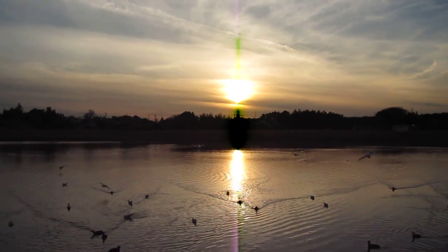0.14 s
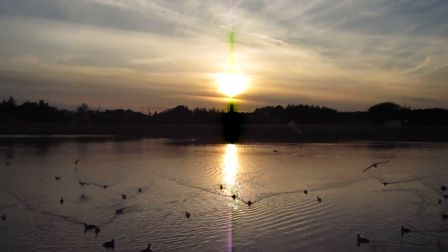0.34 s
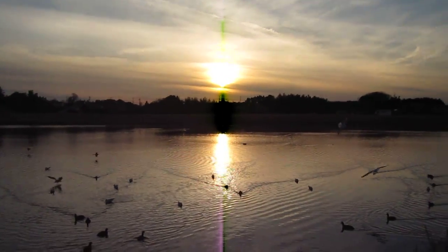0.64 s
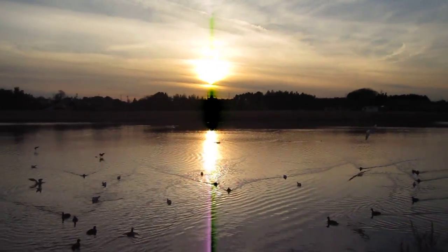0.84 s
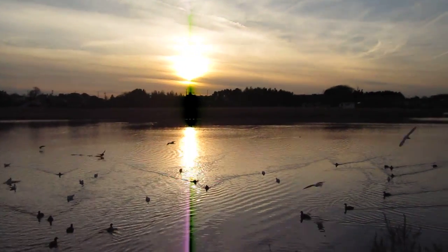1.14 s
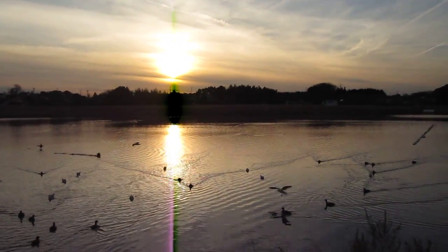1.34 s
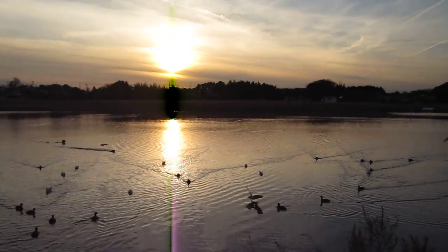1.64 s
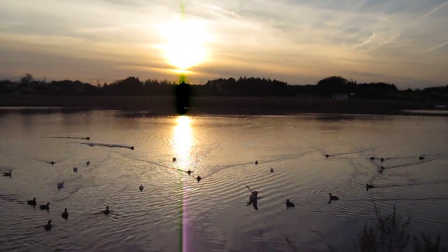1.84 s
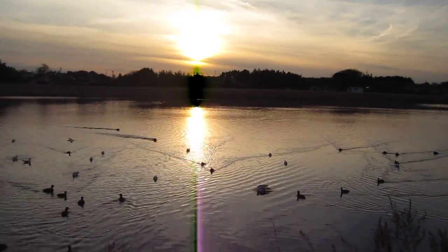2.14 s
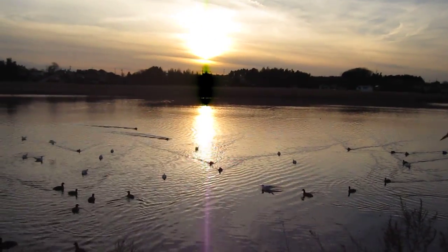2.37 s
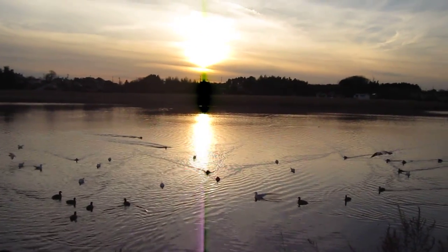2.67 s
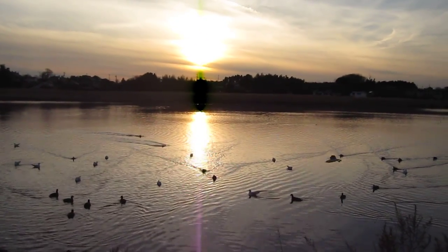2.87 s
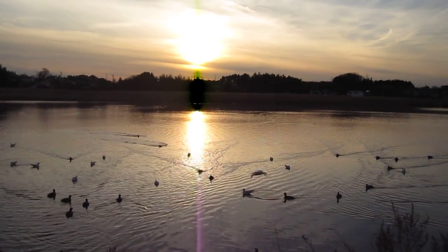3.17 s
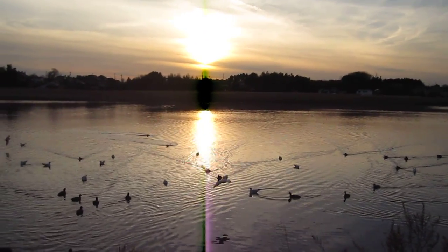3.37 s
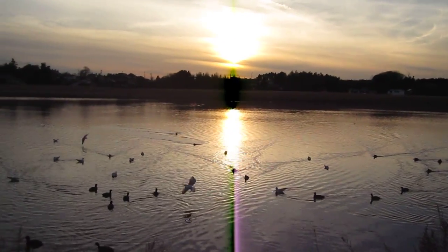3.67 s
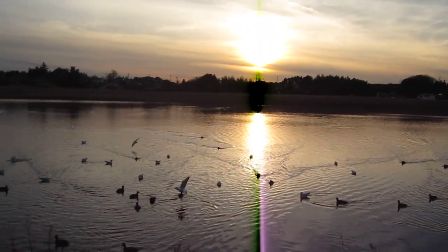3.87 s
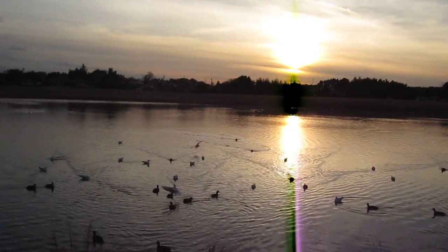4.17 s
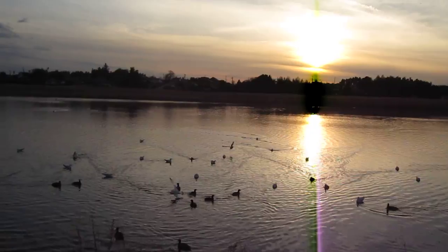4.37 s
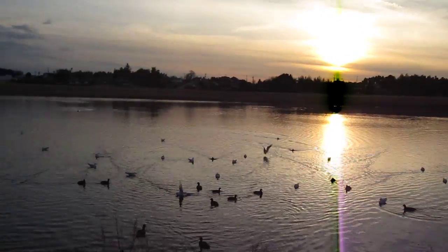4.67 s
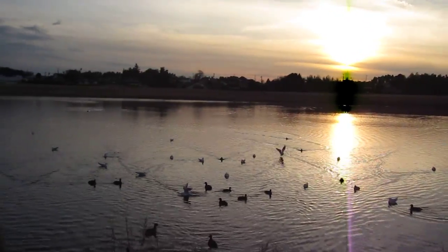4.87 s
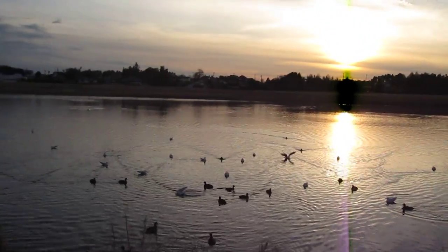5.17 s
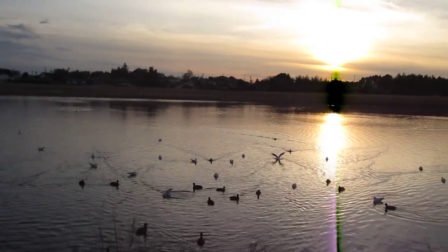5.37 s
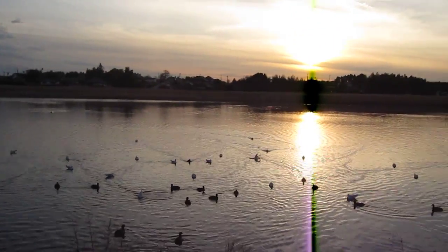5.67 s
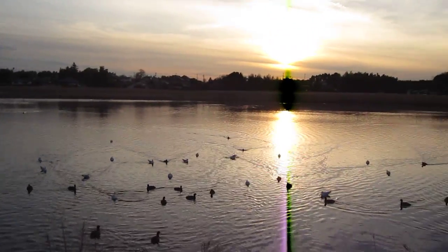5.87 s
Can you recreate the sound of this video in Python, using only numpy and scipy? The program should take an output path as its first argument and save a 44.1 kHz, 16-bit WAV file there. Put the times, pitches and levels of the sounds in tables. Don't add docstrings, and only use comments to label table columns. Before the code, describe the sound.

A faint steady bed of distant traffic, air and microphone hiss lies under everything, its bass swelling gently. From about 0.7 s waterfowl paddle nearby: soft spray, clustered hollow plops near 1 s, then gurgling small bubbles and sharp ticking drops until about 1.95 s. At 1.95 s a gull yelps quickly upward and breaks into a harsh, high, raspy scream, rough and buzzing, sliding down and ending near 2.6 s with a dull short echo off the lake. Splashing resumes at 2.6 s, with crisp snapping drops around 2.75 to 2.95 s, thinning to a few plops by 3.5 s. After a quiet gap, a second cry comes from 4.04 to 4.6 s: lower yelp, a dip, a ragged swell, then a clearer falling end. Quiet air follows, with small plops near 5.15 and 5.4 s, low soft wind thumps around 5.3 s and tiny dry ticks at 5.9 s.

```python
import sys
import numpy as np
from scipy import signal
from scipy.fft import rfft, irfft, next_fast_len
from scipy.io import wavfile

SR = 44100
rng = np.random.default_rng(int(sys.argv[2]) if len(sys.argv) > 2 else 0)


def pcm_store(signal):
    levels = np.round(np.clip(np.atleast_2d(signal), -1, 1) * 32767)
    wavfile.write(sys.argv[1], SR, levels.astype(np.int16).T)


def boost_factor(decibels):
    exponent = np.asarray(decibels, float) / 20
    return 10 ** exponent


N = 265237
T = np.arange(N) / SR


def curves(tables, fade_s=0.00054):
    rows = np.vstack(tables)
    gate = 0
    for table in tables:
        inside_s = np.minimum(T - table[0][0], table[-1][0] - T)
        gate = gate + np.clip(inside_s / fade_s + .5, 0, 1)
    columns = [np.interp(T, rows[:, 0], column) for column in rows[:, 1:].T]
    return columns, np.minimum(gate, 1)


def per_cry(rows):
    between_cries_s = 3.3
    return [np.where(T < between_cries_s, first, second) for first, second in zip(*rows)]


def lowpass(x, order, hz):
    return signal.sosfilt(signal.butter(order, hz, fs=SR, output="sos"), x)


def colour(x, points):
    hz, db = np.transpose(points)
    size = next_fast_len(N)
    f = np.maximum(np.arange(size // 2 + 1) * SR / size, 1)
    gain_db = np.interp(np.log(f), np.log(hz), db, left=-60, right=-60)
    out = irfft(rfft(x, size) * boost_factor(gain_db), size)[:N]
    return out / out.std()


def turbulence(points):
    return colour(rng.standard_normal(N), points)


def shake(width_hz):
    z = lowpass(rng.standard_normal((2, N)), 2, width_hz / 2)
    return (z[0] + 1j * z[1]) / np.sqrt(2 * np.mean(z ** 2))


def jitter(depth, width_hz):
    return 1 + depth * shake(width_hz).real


def tone(hz, rough, width_hz):
    rough = np.clip(rough, 0, 1)
    phasor = np.exp(2j * np.pi * np.cumsum(hz) / SR)
    return phasor * (np.sqrt(1 - rough) + np.sqrt(rough) * shake(width_hz))


def add_ring(out, start_s, peak_db, hz, t60_s, rise_s, glide):
    t = np.arange(int((t60_s + 3 * rise_s) * SR)) / SR
    shape = (1 - np.exp(-t / rise_s)) ** 2 * np.exp(-np.log(1000) * t / t60_s)
    ring = boost_factor(peak_db) * shape / shape.max() * np.sin(2 * np.pi * hz * (t + glide * t ** 2 / t60_s))
    i = max(int(start_s * SR), 0)
    out[i:i + len(t)] += ring[:N - i]


# freq_hz, density_db_per_hz
AIR_SPECTRUM = [(20, -10), (45, -3), (80, -5.5), (186, -9), (336, -9.5), (421, -12), (720, -13.5),
                (1160, -14.5), (1460, -16.5), (1750, -16), (2300, -22), (3310, -23.5), (5340, -27.5),
                (17200, -39)]
# freq_hz, level_db
WHINE = [
    (15735, -88),
]


def air():
    bed = turbulence(AIR_SPECTRUM)
    bass = lowpass(bed, 2, 200)
    swell = boost_factor(1.1 * shake(3.1).real)
    whine = sum(np.sqrt(2) * boost_factor(db) * np.sin(2 * np.pi * hz * T) for hz, db in WHINE)
    return boost_factor(-47.4) * (bed + bass * (swell - 1)) + whine


# start_s, peak_db, pitch_hz
THUMPS = [
    (1.297, -45, 57.7),
    (5.319, -38.5, 85.5),
    (5.347, -39, 77),
]
# start_s, peak_db, centre_hz
CREAKS = [
    (5.8965, -37, 9000),
    (5.948, -46, 11500),
    (5.9742, -38, 8600),
]


def camera_knocks():
    out = np.zeros(N)
    for start_s, peak_db, hz in CREAKS:
        add_ring(out, start_s, peak_db, hz, .001, .00005, 0)
    for start_s, peak_db, hz in THUMPS:
        add_ring(out, start_s, peak_db, hz, .12, .008, 0)
    return out


# start_s, peak_db, pitch_hz, t60_s
PLOPS = [(0.895, -40, 710, 0.041), (1.027, -41, 736, 0.042), (1.089, -39, 760, 0.081),
         (1.174, -57, 729, 0.06), (1.211, -33, 632, 0.031), (1.229, -27.5, 521, 0.034),
         (2.591, -35, 1530, 0.049), (2.746, -54, 1940, 0.072), (2.904, -34.5, 776, 0.03),
         (2.991, -37.5, 1230, 0.043), (5.147, -44, 1210, 0.037), (5.409, -41, 716, 0.12),
         (4.174, -35.5, 736, 0.02),
]
# start_s, peak_db, pitch_hz, t60_s, upward_slide
BUBBLES = [(0.8215, -35.5, 760, 0.024, 0.084), (0.927, -32, 637, 0.031, 0.055),
           (0.9355, -34, 686, 0.022, .1), (0.975, -40, 804, .09, .01), (0.9805, -27, 800, .04, .01),
           (0.9842, -23, 676, 0.014, .01), (0.9935, -34, 690, 0.026, .01),
           (1.001, -45.5, 1690, .035, 0.031), (2.708, -38.5, 900, 0.13, 0.56),
           (3.3425, -37.5, 925, 0.056, 0.29), (3.411, -40, 650, 0.044, .1),
           (3.4185, -34.5, 640, 0.044, 0.77), (3.4305, -40, 1730, .035, 0.079),
           (3.4721, -39.5, 1890, 0.018, .1)]
# start_s, peak_db, pitch_hz
GURGLE = [(1.29, -48, 830), (1.333, -47, 633), (1.345, -37, 605), (1.366, -37, 756), (1.39, -46, 716),
          (1.407, -38, 860), (1.436, -39, 684), (1.499, -33, 766), (1.53, -32.5, 670), (1.558, -39, 732),
          (1.577, -36, 606), (1.623, -38, 799), (1.652, -38, 720), (1.674, -49, 655), (1.698, -42, 576),
          (1.74, -45, 929), (1.786, -38, 584), (1.814, -40, 840), (1.829, -36, 743), (1.857, -36, 552),
          (1.896, -38, 678), (1.917, -37.5, 797)]
# start_s, peak_db, pitch_hz
FIZZ = [(0.9879, -35, 1730), (1.0552, -50, 2300), (1.0931, -47, 1670), (1.1749, -44, 1170),
        (1.2553, -45, 1690), (1.3201, -37, 1710), (1.3625, -30, 1150), (1.3899, -36, 2170),
        (1.4363, -39, 1200), (1.4892, -48, 1740), (1.5177, -33, 990), (1.5541, -30, 1000),
        (1.595, -44, 1660), (1.6174, -34, 1170), (1.6518, -40, 2290), (1.7122, -31, 2090),
        (1.7367, -35, 2180), (1.7616, -38, 2130), (1.816, -31, 1050), (1.8329, -32, 1140),
        (1.8659, -39, 969), (1.8808, -34, 1020), (1.9048, -33, 1690), (1.9312, -37, 1640)]


def bubbles():
    out = np.zeros(N)
    plops = PLOPS
    for (start_s, peak_db, hz, t60_s), (late, pitch) in zip(plops, rng.random((len(plops), 2))):
        add_ring(out, start_s - .006, peak_db - 5.0, hz * .97, max(t60_s, .01), .006, .2)
        partner_hz = hz * (.74 + .16 * pitch)
        add_ring(out, start_s - .003 + .006 * late, peak_db - 9.0, partner_hz, .028, .005, .15)
    for start_s, peak_db, hz, t60_s, slide in BUBBLES:
        add_ring(out, start_s, peak_db, hz, t60_s, .0012, slide)
    for start_s, peak_db, hz in GURGLE:
        add_ring(out, start_s - .002, peak_db - 4.0, hz * .95, .05, .002, .2)
    for start_s, peak_db, hz in FIZZ:
        add_ring(out, start_s - .001, peak_db - 5.5, hz * .97, .03, .0012, .1)
    return out


# start_s, peak_db, centre_hz
SLAPS = [(0.8214, -57, 4350), (0.86, -59, 4800), (0.874, -46, 5070), (0.954, -35.5, 5000),
         (0.9897, -37.5, 4270), (1.056, -54, 5000), (1.108, -40.5, 6000), (1.151, -41, 5210),
         (1.175, -45, 4160), (1.23, -57, 3920), (1.298, -52, 4050), (1.314, -39, 5200), (1.392, -40, 4000),
         (1.437, -57, 5190), (1.45, -56, 5150), (1.531, -51, 4100), (1.6514, -56, 5160), (1.615, -43, 5040),
         (1.708, -45, 5000), (1.727, -52, 5300), (1.79, -40, 4800), (2.743, -42, 3750), (2.84, -36, 3740),
         (2.881, -44, 3860), (2.95, -58, 4840), (3.014, -61, 4580), (3.443, -54, 3870)]
# start_s, snap_peak_db, ring_peak_db, ring_hz
CLICKS = [(0.822, -44, -33.5, 2290), (0.874, -36, -39, 3270), (0.912, -44, -47, 2300),
          (0.9506, -44, -44, 2450), (1.0551, -42, -50, 2340), (1.062, -40, -43, 3000),
          (1.086, -44, -45, 3000), (1.1074, -28, -43, 5500), (1.2487, -41, -41, 3460),
          (1.3916, -25, -39, 2210), (1.438, -41, -51, 2400), (1.453, -38, -36.5, 4860),
          (1.5333, -40, -35, 2500), (1.6169, -36, -44, 2150), (1.6522, -43, -33, 2340),
          (1.712, -36, -26, 2180), (1.729, -33, -39, 5600), (1.797, -38, -42, 3000),
          (2.7462, -24, -29, 1930), (2.7836, -42, -42, 2200), (2.8424, -25, -33, 2090),
          (2.8842, -33, -42, 2070), (2.9425, -43, -34, 2670), (3.0079, -44, -42, 2030),
          (3.2055, -36, -36, 2090), (3.4224, -44, -35.5, 2350), (3.434, -44, -42, 1854),
          (5.151, -44, -37, 1508)]
# start_s, peak_db, pitch_hz
SNAPS = [
    (1.4365, -27, 3400),
    (2.8836, -31, 3600),
    (2.9427, -23, 3200),
]


def falling_drops():
    out = np.zeros(N)
    spread_s = 0.017
    for (start_s, peak_db, hz), cracks in zip(SLAPS, rng.random((len(SLAPS), 10, 2))):
        for late, pitch in cracks:
            crack_hz = np.clip(hz * 2 ** (1.8 * pitch - 1.4), 900, 14000)
            add_ring(out, start_s + spread_s * late ** 2, peak_db - 0.5, crack_hz, .003, .0001, 0)
    for start_s, snap_db, ring_db, hz in CLICKS:
        add_ring(out, start_s, ring_db, hz, .009, .0002, .05)
        add_ring(out, start_s, snap_db, 5200, .0005, .00003, 0)
    for start_s, peak_db, hz in SNAPS + [(4.715, -47, 6000)]:
        add_ring(out, start_s, peak_db, hz, .001, .00005, 0)
    return out


# start_s, activity_db
SPLASH = [(0.7, -17), (0.85, -12), (0.95, -8), (1.012, -8.5), (1.6, -6), (1.95, -5.5), (2.58, -6),
          (2.93, -6), (3.1, -8), (3.205, -8), (3.27, -14), (3.416, -11), (3.47, -14), (3.55, -17)]
# freq_hz, level_db
SPRAY = [(530, -13), (900, -20), (1500, -6), (2270, -5), (2690, -9), (3200, -8), (5220, -14.5),
         (16000, -31)]


def splashing():
    spray_per_s, bubbles_per_s, last_s = 3600.0, 330.0, 4
    (busy_db,), gate = curves([SPLASH], fade_s=0.1)
    struck = rng.random(N) < spray_per_s / SR
    drops = struck * boost_factor(0.45 * rng.exponential(size=N)) * rng.standard_normal(N)
    spray = colour(drops / drops.std() + 1.05 * rng.standard_normal(N), SPRAY)
    spray = spray * boost_factor(1.8 * shake(37).real)
    swarm = np.zeros(N)
    for when, pitch, size in rng.random((int(bubbles_per_s * last_s), 3)):
        add_ring(swarm, when * last_s, 9.0 * size, 580 * 3.6 ** pitch ** 1.6, .03, .002, .12)
    swarm = swarm / swarm[:last_s * SR].std()
    swarm_db = -43.5 + 0.94 * busy_db - 6 * (T > 2.3)
    return gate * (boost_factor(-40 + busy_db) * spray + boost_factor(swarm_db) * swarm)


# start_s, end_s, centre_hz, level_db
SCRAPES = [
    (4.199, 4.3, 4700, -48.5),
    (4.23, 4.3, 5330, -52),
    (4.392, 4.466, 4670, -45.5),
    (4.406, 4.445, 5200, -46),
    (4.432, 4.461, 6050, -46),
    (2.29, 2.33, 4920, -38),
    (4.09, 4.2, 4800, -54),
    (4.092, 4.15, 6120, -46),
    (4.095, 4.15, 5870, -50),
]


def scrapes():
    out, grain = np.zeros(N), shake(330)
    for k, (start_s, end_s, hz, level_db) in enumerate(SCRAPES):
        i = np.arange(int(start_s * SR), int(end_s * SR))
        gate = np.clip(np.minimum(T[i] - start_s, end_s - T[i]) / .012, 0, 1)
        whistle = (grain[i - k * 9000] * np.exp(2j * np.pi * hz * T[i])).real
        out[i] += np.sqrt(2) * boost_factor(level_db) * gate * whistle
    return out


# start_s, flow_db
RASP = [
    [(1.996, -8), (2.348, -10), (2.464, -11.5), (2.528, -28), (2.58, -33)],
    [(4.078, -4), (4.11, -9), (4.192, -10), (4.38, -1), (4.42, -1), (4.458, -4.5), (4.48, -29)],
]
# start_s, extra_beak_db
GAPE = [
    [(1.996, 4), (2.1, 3), (2.2, 1), (2.3, 4), (2.4, 1), (2.58, -8)],
    [(4.078, -9), (4.15, 2), (4.2, 3), (4.24, -5), (4.29, -3), (4.32, -11), (4.39, -5), (4.43, -1.5),
     (4.48, 2)],
]
# throat_db, beak_db, top_octave_db
RASP_LEVELS = [
    (-45, -47, -58.5),
    (-55.5, -55.5, -69),
]
# freq_hz, level_db
RASP_THROAT = [(900, -17), (1200, -6.5), (1600, -15), (2300, -1.5), (2700, -3), (3300, -2.5), (4200, -7.5)]
# freq_hz, level_db
RASP_BEAK = [(3600, -11), (4200, 1), (4800, 8.5), (5150, 0), (5500, -1), (5900, 0), (6400, 1.5),
             (7600, -10), (8400, -8.5)]
# freq_hz, level_db
RASP_TOP = [(4710, -42), (8000, -7), (10100, 1), (10900, 1), (13300, -1.5), (15700, -11), (16000, -29),
            (16500, -80)]


def rasp():
    tense_hz, top_db_per_khz = 3710, 22
    (flow_db,), gate = curves(RASP)
    throat_db, beak_db, top_db = per_cry(RASP_LEVELS)
    high_hz, gape_db = curves(HIGH)[0][0], curves(GAPE)[0][0]
    throat_db = throat_db + 1.11 * flow_db + 17.5 + 4.4 * shake(190).real
    beak_db = beak_db + gape_db + 1.07 * flow_db + 17.5
    beak_db = beak_db + 2.0 * shake(83).real + 2.0 * shake(14).real
    top_db = top_db + top_db_per_khz * (high_hz - tense_hz) / 1000 + 17.0 + 1.5 * shake(90).real
    throat = boost_factor(throat_db) * turbulence(RASP_THROAT)
    beak = boost_factor(beak_db) * turbulence(RASP_BEAK)
    top = boost_factor(top_db) * turbulence(RASP_TOP)
    return gate * (throat + beak + top)


# start_s, pitch_hz, level_db
YELPS = [
    [(1.952, 955, -43), (1.976, 1138, -25), (1.984, 1260, -29.5), (1.99, 1390, -27.5), (1.999, 1560, -35)],
    [(4.042, 779, -41), (4.056, 950, -37), (4.073, 1143, -26.5), (4.082, 1270, -40)],
]
# freq_hz, gain_db
YELP_THROATS = [
    [(470, -30), (800, -11), (1190, 2.5), (1760, -3), (2320, 3), (3750, -3), (4600, 0), (6820, -5.5),
     (8880, -23), (14000, -16)],
    [(410, -40), (700, -32), (1040, -5.5), (2190, 12.5), (3560, 1), (4800, -2.5), (5200, -40), (6790, 1),
     (7500, -44), (9750, -68), (16500, -120)],
]


def yelps():
    full_db, bloom_per_octave, odd_db = -28, .8, -4
    out = np.zeros(N)
    for table, throat in zip(YELPS, YELP_THROATS):
        (hz, level_db), gate = curves([table], fade_s=0.0017)
        phase = 2 * np.pi * np.cumsum(hz * jitter(0.0081, 360)) / SR
        throat_hz, throat_db = np.transpose(throat)
        stack, power = 0, 0
        for k in range(1, 14):
            gain_db = np.interp(np.log(k * hz), np.log(throat_hz), throat_db)
            gain_db = gain_db + bloom_per_octave * np.log2(k) * np.minimum(level_db - full_db, 0)
            if k > 1 and k % 2:
                gain_db = gain_db + odd_db
            stack = stack + boost_factor(gain_db) * np.sin(k * phase + k * k)
            power = power + boost_factor(gain_db) ** 2
        out += gate * boost_factor(level_db) * stack * np.sqrt(2 / power)
    return out


# start_s, pitch_hz, level_db, partial_2_rel_db, partial_3_rel_db
HIGH = [
    [(1.995, 3785, -25.5, -15, -20), (2.005, 3785, -33, -17, -19), (2.028, 3760, -26.5, -13, -14),
     (2.079, 3620, -28.5, -10, -17), (2.1, 3707, -31, -6.5, -22), (2.269, 3490, -34.5, -9, -18),
     (2.325, 3553, -35, -4, -36), (2.445, 3160, -37, -19, -30), (2.5, 2920, -41, -3.5, -36)],
    [(2.502, 2810, -43, -13, -36), (2.525, 2780, -44, -20, -36), (2.559, 2660, -41, -24, -36),
     (2.578, 2440, -62, -24, -36)],
    [(4.079, 3680, -40, -18, -22), (4.087, 3685, -32, -20, -22), (4.11, 3673, -30, -16, -16),
     (4.164, 3656, -36.5, -9, -21), (4.187, 3618, -43, -14, -30), (4.2, 3532, -45, -14, -28),
     (4.218, 3496, -54, -10, -28)],
    [(4.226, 3400, -41, -20, -35), (4.254, 3287, -37, -26, -25), (4.312, 3405, -34.5, -21, -19.5),
     (4.36, 3436, -30, -16, -45), (4.392, 3356, -31, -8, -40), (4.406, 3284, -31.5, -12, -40),
     (4.418, 3205, -44, -20, -40), (4.44, 3080, -50, -20, -30)],
    [(4.45, 2955, -52, -12, -15), (4.46, 2950, -38.5, -14, -19), (4.479, 2820, -31.5, -24, -20),
     (4.494, 2814, -31.5, -23, -16.5), (4.528, 2647, -38.5, -8, -36), (4.562, 2510, -39, -18, -34),
     (4.576, 2286, -33, -13.5, -23), (4.585, 2080, -33.5, -13, -40), (4.592, 2010, -50, -22, -40)],
]
WOBBLE = [
    (2.5,),
    (3.5,),
]


def high_voice():
    (hz, level_db, second_db, third_db), gate = curves(HIGH)
    second_db = second_db + per_cry(WOBBLE)[0] * shake(47).real
    turn = tone(hz * jitter(0.00563, 178), 0, 1.)
    first = turn * tone(0 * T, .1, 250.)
    second = boost_factor(second_db) * turn ** 2 * tone(0 * T, .15, 250.)
    upper = boost_factor(third_db) * (turn ** 3 + boost_factor(-10) * turn ** 4) * tone(0 * T, 0.3, 400.)
    return gate * boost_factor(level_db) * (first + second + upper), turn


# start_s, pitch_hz, level_db, flutter_depth
LOW = [
    [(1.997, 2210, -38, .6), (2.006, 2200, -29, 0.36), (2.03, 2150, -36, 0.48), (2.069, 2124, -31, 0.23),
     (2.145, 2106, -37.5, 0.64), (2.22, 2110, -34, 0.66), (2.335, 2120, -35.5, 0.54),
     (2.41, 1985, -38.5, 0.31), (2.46, 1830, -37, 0.75)],
    [(2.462, 1825, -38, 0.77), (2.519, 1670, -35.5, .2), (2.54, 1610, -47, .2), (2.556, 1575, -60, .2)],
    [(4.08, 2179, -33.5, 1.1), (4.14, 2127, -35, 0.89), (4.183, 2045, -29, .4), (4.205, 2050, -33, .9),
     (4.258, 2046, -33, .7), (4.295, 2010, -34.5, .6), (4.31, 2060, -37, 0.82), (4.372, 2130, -39.5, 0.88),
     (4.43, 1940, -46, 0.84)],
    [(4.445, 1880, -42, 0.12), (4.468, 1800, -32, .1), (4.486, 1730, -40, .1)],
]
FLUTTER = [
    (228,),
    (290,),
]


def low_voice(rough):
    (hz, level_db, depth), gate = curves(LOW)
    low = gate * boost_factor(level_db) * tone(hz * jitter(0.01, 60.7), rough, 400.0)
    flutter_hz, = per_cry(FLUTTER)
    flutter = tone(flutter_hz * jitter(.06, 40.), .3, 60.).real
    return low * (1 + depth * flutter) / np.sqrt(1 + depth ** 2 / 2)


# start_s, end_s, share_of_high_pitch, start_db, end_db
HALF = [(2.047, 2.102, 0.47, -36, -41), (2.133, 2.357, 0.47, -34, -38.5), (2.354, 2.46, 0.45, -42, -48),
        (4.082, 4.154, 0.495, -34.5, -37), (4.149, 4.211, 0.48, -38, -37), (4.212, 4.3, 0.5, -34.5, -40.5),
        (4.291, 4.33, 0.51, -37, -36), (4.334, 4.394, .52, -43, -39), (4.391, 4.431, .46, -44, -38),
        (4.41, 4.45, .39, -40, -41.5), (4.473, 4.519, .5001, -39, -38.5), (4.528, 4.559, .54, -39.5, -43)]


def half_voice(high_hz, rough):
    spells = [[(start_s, share, start_db), (end_s, share, end_db)]
              for start_s, end_s, share, start_db, end_db in HALF]
    (share, level_db), gate = curves(spells)
    return gate * boost_factor(level_db) * tone(share * high_hz * jitter(0.01152, 67.6), rough, 220.0)


# low_x_high_gain_db, low_rough_0_1, half_copies_rel_db, half_rough_0_1
CHOP = [
    (28.9, 0.36, -6.5, 0.28),
    (16.9, 0.45, -16, 0.3),
]
# start_s, extra_copies_db
GRIP = [
    [(1.996, -3), (2.09, -1.5), (2.2, 2.5), (2.33, 1.5), (2.45, -0.5), (2.56, 3)],
    [(4.078, -3), (4.105, -5), (4.15, -4), (4.17, -8), (4.22, 2), (4.29, 2), (4.33, 1), (4.44, -2),
     (4.49, -11)],
]


def screams():
    (high_hz, high_db, _, third_db), _ = curves(HIGH)
    chop_db, low_rough, half_chop_db, half_rough = per_cry(CHOP)
    grip_db = curves(GRIP)[0][0]
    high, turn = high_voice()
    low = low_voice(low_rough)
    half = half_voice(high_hz, half_rough)
    low_chop = boost_factor(6.0) * turn + boost_factor(-15.5) * turn ** 2 + boost_factor(-15.0) * turn ** 3
    low_copies = boost_factor(high_db + chop_db + grip_db) * low * low_chop
    upper_chop = boost_factor(-5.5) * turn ** 2 + turn ** 3 + boost_factor(-10) * turn ** 4
    half_copies = boost_factor(half_chop_db) * half * (turn + boost_factor(third_db + 13.5) * upper_chop)
    return np.sqrt(2) * (high + low + half + low_copies + half_copies).real


def shore(near):
    t60_s, level_db = .3, -19
    t = np.arange(int(.5 * SR)) / SR
    tail = rng.standard_normal(len(t)) * np.exp(-np.log(1000) * t / t60_s) * (t > .01)
    return signal.fftconvolve(near, boost_factor(level_db) * tail / np.linalg.norm(tail))[:N]


def echo(birds):
    delay_s, level_db = .035, -9
    return boost_factor(level_db) * np.roll(lowpass(birds, 6, 1400), int(delay_s * SR))


def scene():
    birds = yelps() + lowpass(screams() + rasp() + scrapes(), 8, 15000)
    near = birds + bubbles() + falling_drops() + camera_knocks()
    return (near + echo(birds) + shore(near) + splashing() + air())[None]


def band_limit(x):
    return signal.sosfilt(signal.butter(12, 17140, fs=SR, output="sos"), x)


def record(dry):
    rounded = np.tanh(3.5 * dry) / 3.5
    top_cut = signal.ellip(10, .2, 80, 17150, fs=SR, output="sos")
    mix = signal.sosfilt(top_cut, rounded)
    return band_limit(mix)


dry = scene()
out = record(dry)
pcm_store(out)
```